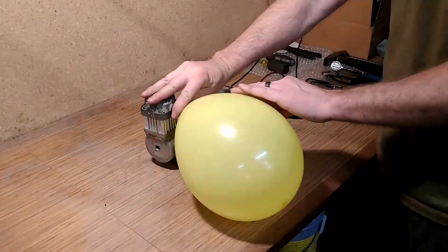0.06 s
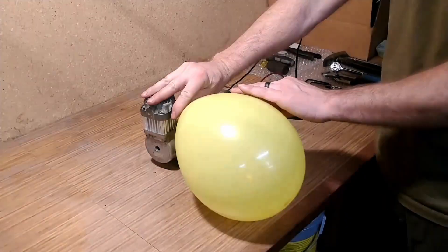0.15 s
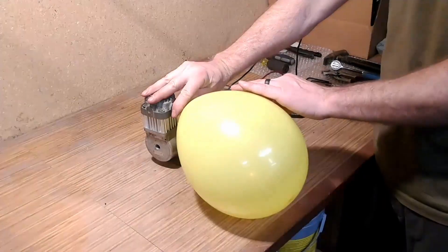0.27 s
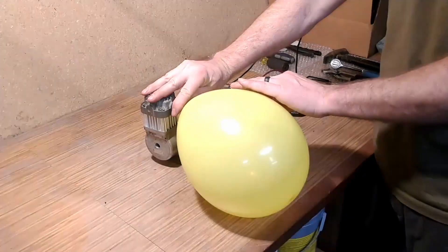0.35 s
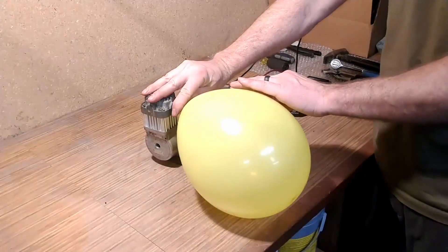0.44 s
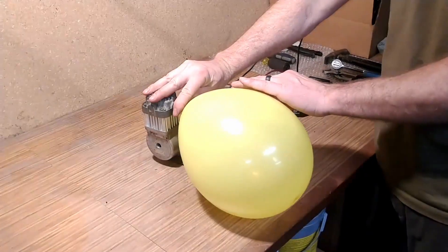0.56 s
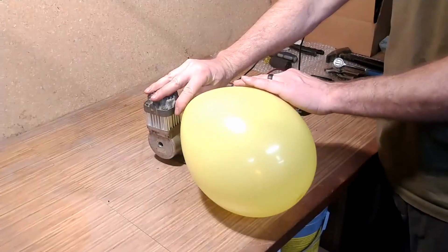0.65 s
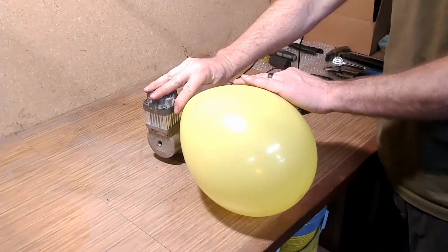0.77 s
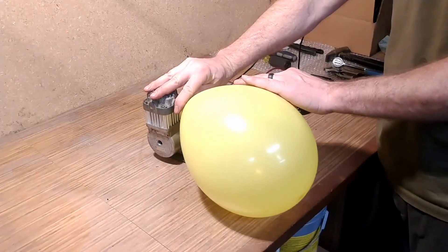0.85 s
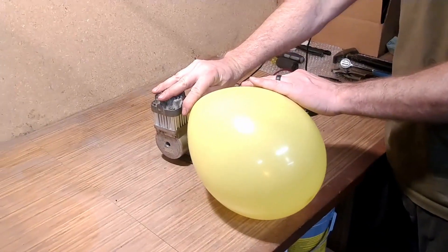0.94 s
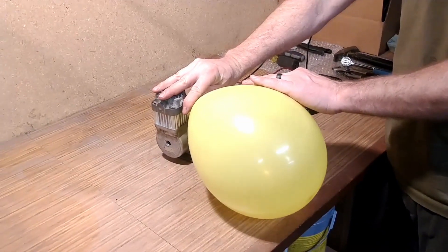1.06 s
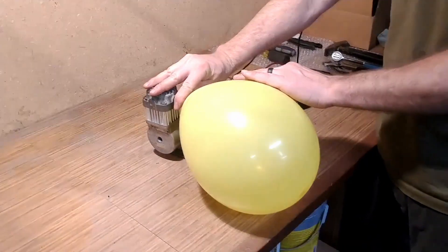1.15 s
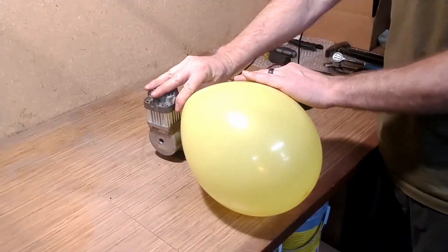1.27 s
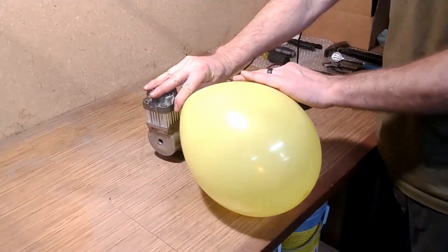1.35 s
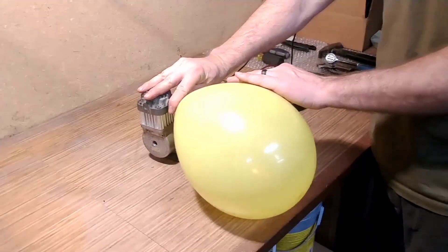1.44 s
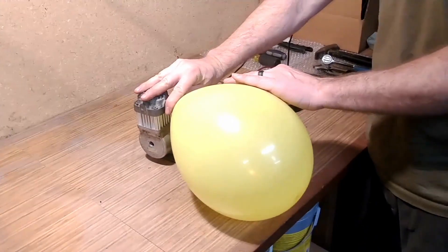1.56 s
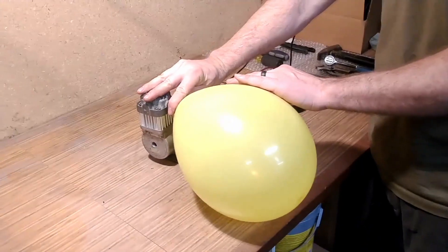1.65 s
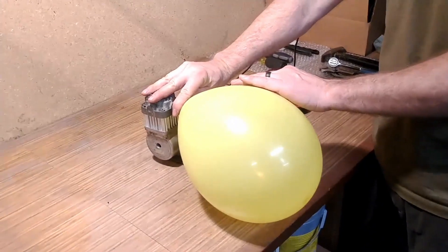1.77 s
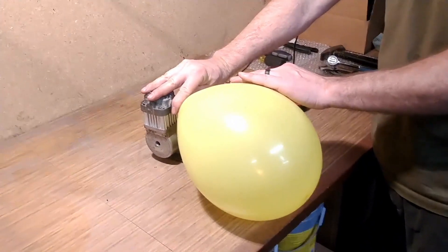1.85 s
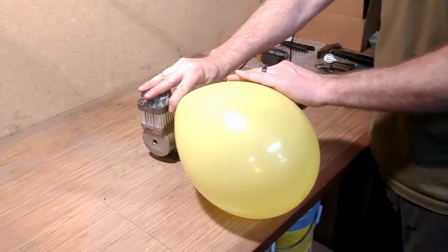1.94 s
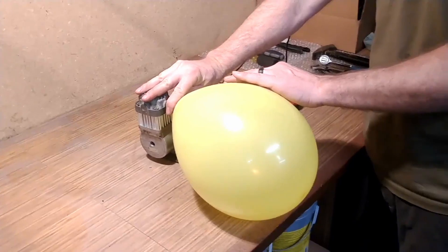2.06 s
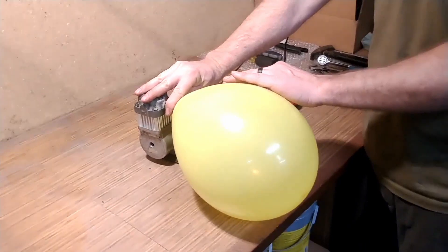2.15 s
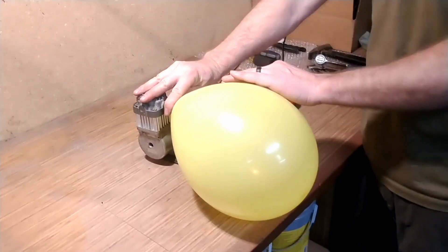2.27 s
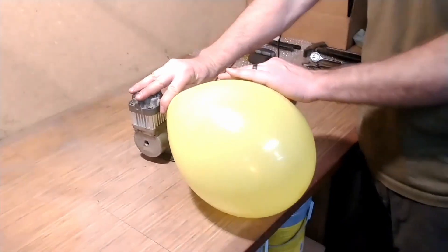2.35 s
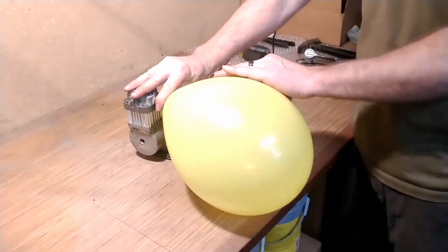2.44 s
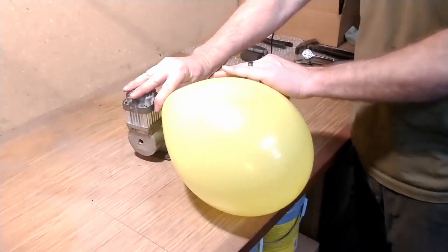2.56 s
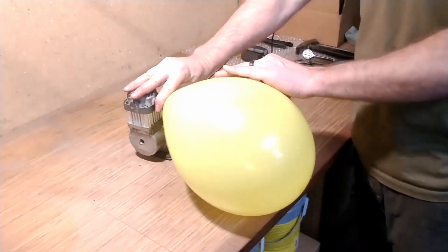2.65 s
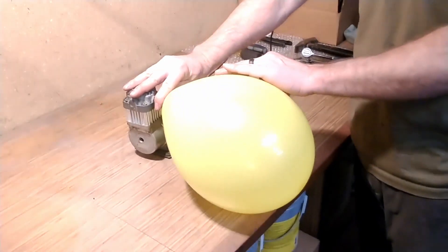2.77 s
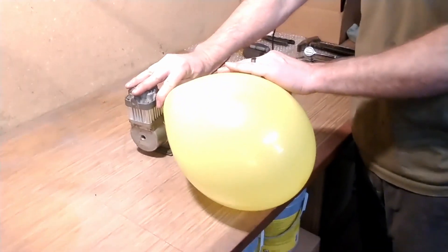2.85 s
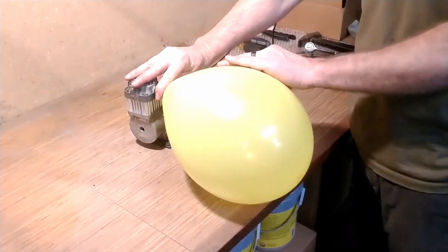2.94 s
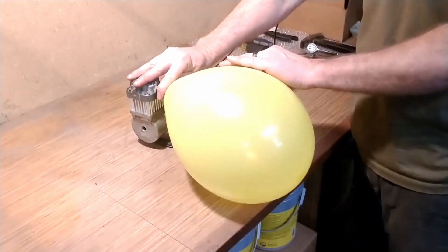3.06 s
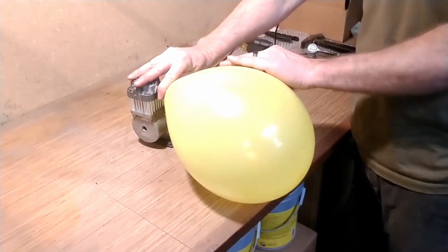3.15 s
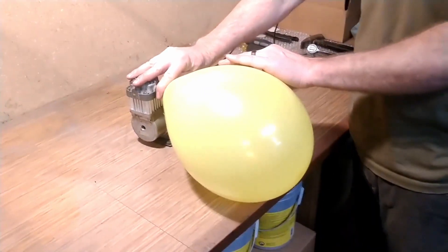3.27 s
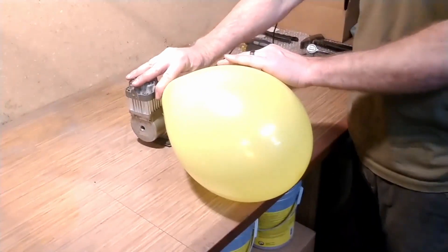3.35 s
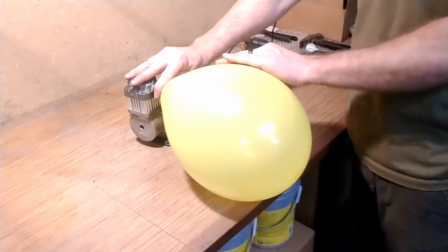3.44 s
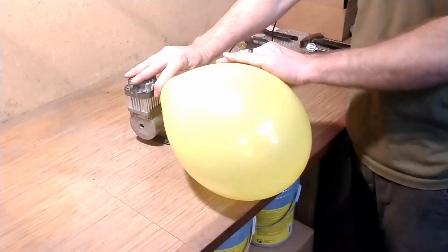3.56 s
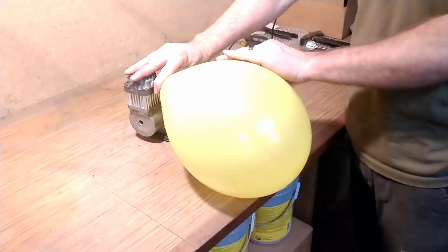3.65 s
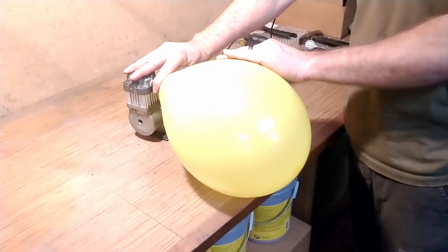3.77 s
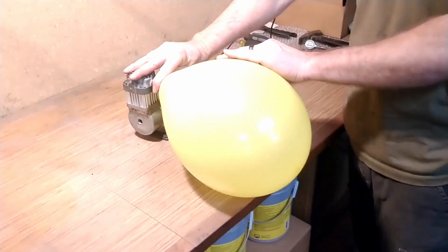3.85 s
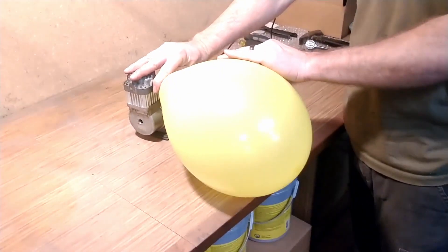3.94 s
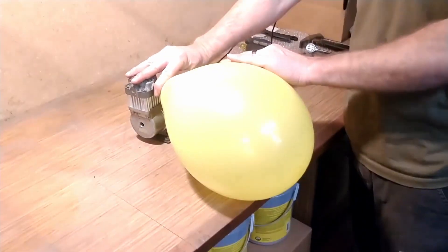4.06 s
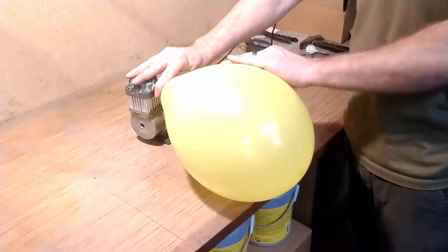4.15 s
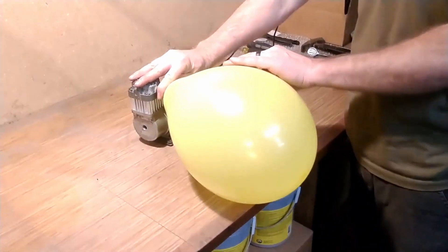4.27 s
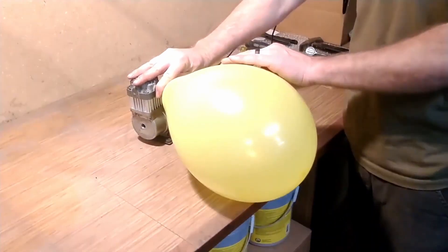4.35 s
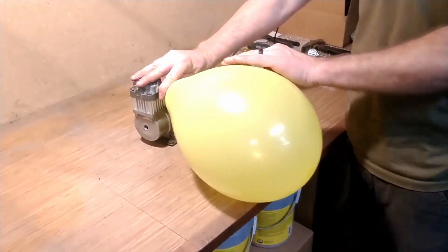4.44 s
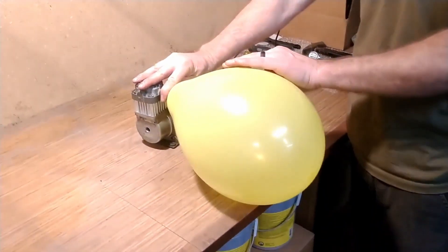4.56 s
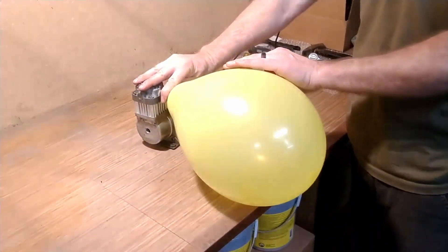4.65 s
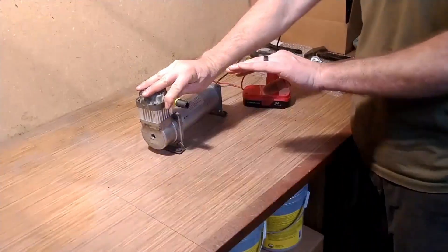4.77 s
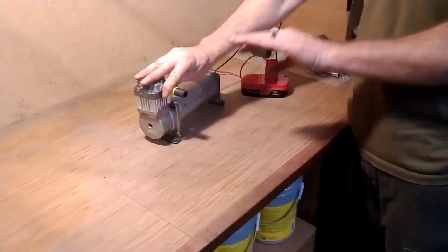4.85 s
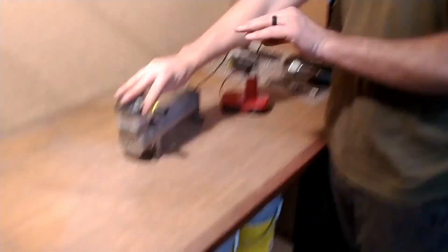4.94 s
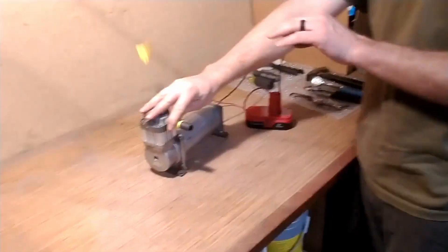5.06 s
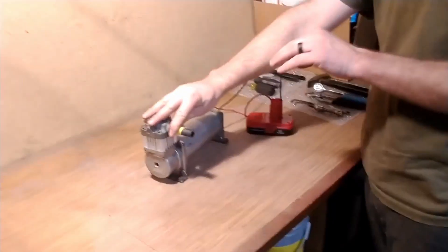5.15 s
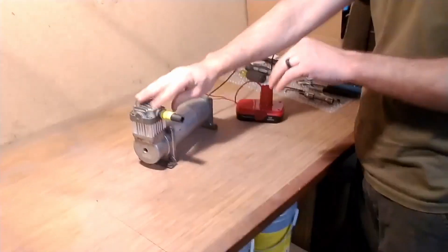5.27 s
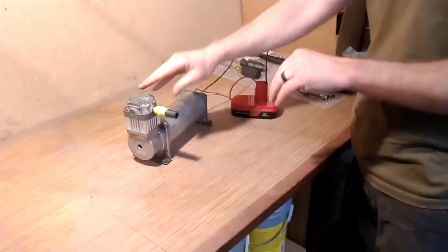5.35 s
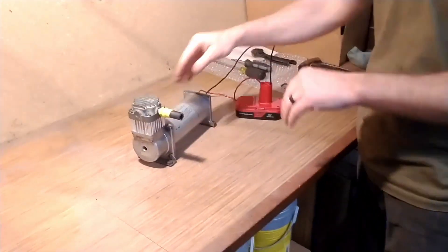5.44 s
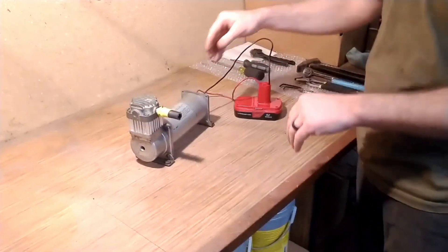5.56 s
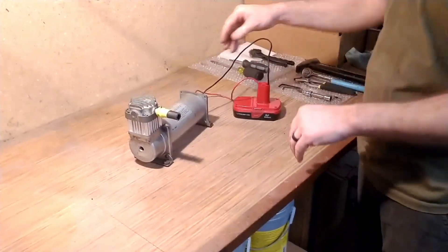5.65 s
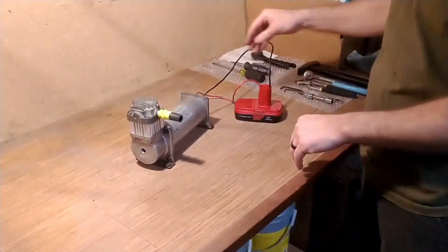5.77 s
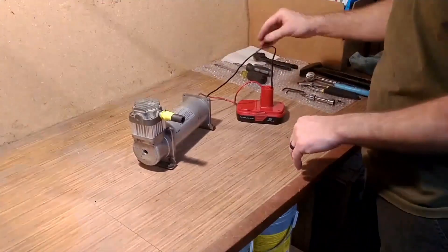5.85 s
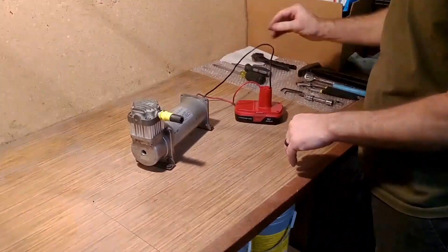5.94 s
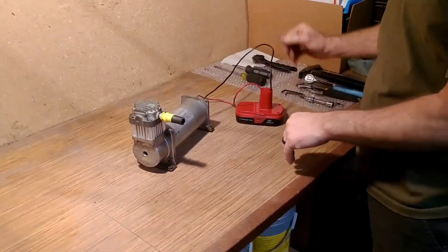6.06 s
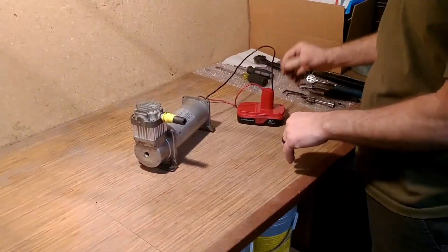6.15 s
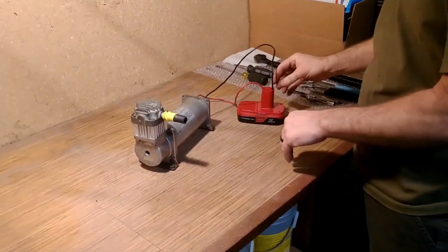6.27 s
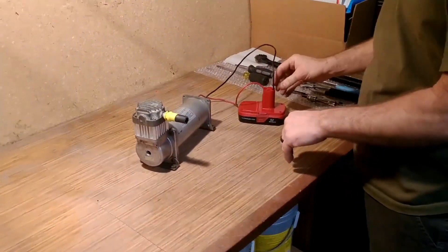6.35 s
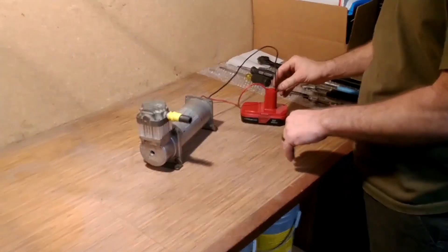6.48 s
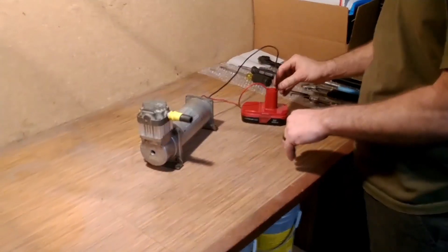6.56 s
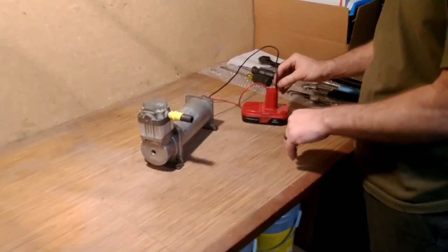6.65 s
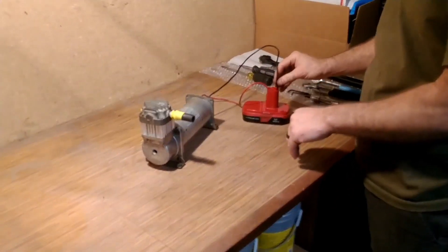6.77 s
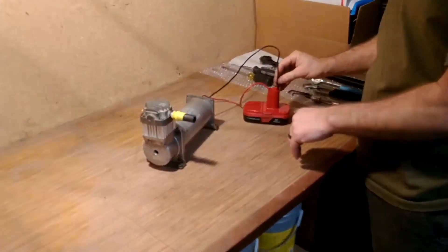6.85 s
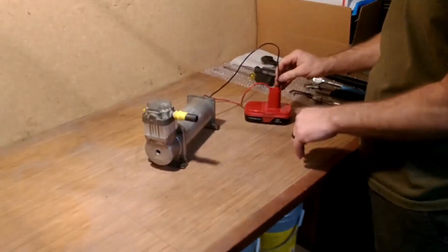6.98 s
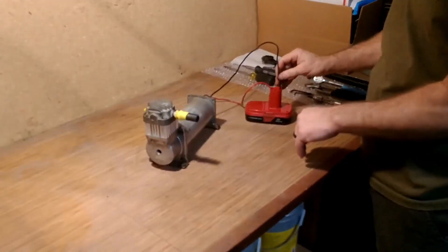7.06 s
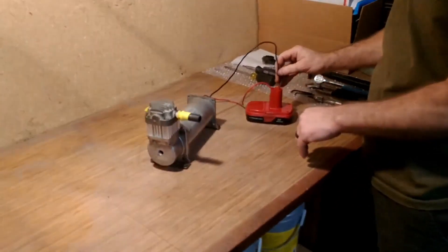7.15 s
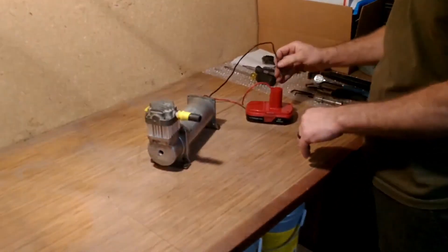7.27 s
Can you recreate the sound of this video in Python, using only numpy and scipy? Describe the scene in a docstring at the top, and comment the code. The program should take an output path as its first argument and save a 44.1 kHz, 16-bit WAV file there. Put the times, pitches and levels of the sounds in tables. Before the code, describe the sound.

Harsh motor buzz with metallic valve chatter, broken by one loud balloon pop and a brief dip, then looser rattling until power is cut.

```python
"""A buzzing, clattering compressor strains against a filling balloon, until a sharp bang echoes in a workshop.
Each crank turn gives pumping harmonics, a hiss of intake air and a valve clack that rings plate and head.
The bang is a short pressure wave with single reflections and a dense tail; gain control ducks after it.
Let go, the machine rocks on its wooden bench every third turn; at last its power is pulled and it runs down.
The machine is heard through two microphone ports, each with its own level and phase."""
import sys
import numpy as np
from scipy import signal
from scipy.fft import rfft, irfft, next_fast_len
from scipy.io import wavfile
from scipy.ndimage import uniform_filter1d, minimum_filter1d

SR = 44100
rng = np.random.default_rng(int(sys.argv[2]) if len(sys.argv) > 2 else 0)


def master(y):
    """Save y as 16-bit WAV."""
    cut = np.clip(np.atleast_2d(y).T, -1, 1)
    pcm = np.round(cut * 32767)  # scale
    wavfile.write(sys.argv[1], SR, pcm.astype(np.int16))


N = 322371
TIME = np.arange(N) / SR  # s

BURST_S = 4.8305  # the balloon bursts
POWER_OFF_S, SHUDDER_S = 7.14, 0.091  # power pulled; time for the shudder to build up
# slow swell of the machine's loudness as picked up: t/s, level/dB
LOUDNESS_SWELL = [(0, -0.5), (1.3, -1), (1.6, 0.3), (2.3, -0.7), (2.55, -1), (3.1, 0.2), (3.9, -0.8),
                  (4.12, 1), (4.7, -2.5), (5.5, .8), (6.0, -0.6), (6.52, 1.7), (6.85, -1.9), (7.1, 0.4)]


def amp(db):
    """Decibels to gain."""
    return 10 ** (np.asarray(db) / 20)


def evened(x):
    """Scales a sound so that its mid channel has rms 1."""
    mid = np.atleast_2d(x).mean(0)
    return x / np.sqrt(np.mean(mid ** 2) + 1e-20)


def read(points, hz):
    """Reads a spectrum on a log-frequency axis."""
    f, value = np.transpose(points)
    return np.interp(np.log(hz + 1), np.log(f + 1), value)


def follow(rows):
    """Turns rows (s, value, ..) into one curve per column."""
    s, *columns = np.transpose(rows)
    return [np.interp(TIME, s, c) for c in columns]


def ramp(start_s, length_s):
    """Rises from 0 to 1 over a given time."""
    return np.clip((TIME - start_s) / length_s, 0, 1)


def wander(per_s):
    """Slow random drift of rms 1: noise smoothed twice over 1/per_s seconds."""
    width = int(SR / per_s)
    smoothed = uniform_filter1d(rng.standard_normal(N), width)
    return evened(uniform_filter1d(smoothed, width))


def noise_pair(same):
    """White noise for two channels with a given likeness."""
    a, b = rng.standard_normal((2, N))
    same = np.clip(same, 0, 1)
    return np.array([a, same * a + np.sqrt(1 - same ** 2) * b])


def colour(x, points):
    """Filters a sound by a spectrum in dB."""
    size = next_fast_len(N + 4096)
    gain = amp(read(points, np.fft.rfftfreq(size, 1 / SR)))
    return irfft(rfft(x, size) * gain, size)[..., :N]


def ring(x, modes):
    """Rings decaying modes; a wider mode dies sooner, and its dB sets its share of the energy."""
    t = np.arange(SR // 4) / SR
    body = np.zeros(len(t))
    for hz, width, db in modes:
        decay = np.exp(-np.pi * width * t)
        body += amp(db) * np.sqrt(width) * decay * np.cos(2 * np.pi * hz * t)
    return signal.oaconvolve(np.atleast_2d(x), body[None], axes=1)[:, :N]


def ports(x):
    """The two microphone ports hear the machine with their own level and phase."""
    # left minus right: f/Hz, level/dB
    port_balance = [(60, 10), (125, 8), (200, 7), (314, 2.5), (400, 6), (630, 6), (850, 0), (1290, -3),
                    (1760, -3), (2400, 1.5), (2900, 2), (4400, 0), (8000, 2), (15000, -1)]
    # lead of the left port: f/Hz, phase/rad
    port_phase = [(60, 1.7), (125, 1.3), (310, 0.37), (600, 1.09), (1200, -0.4), (1700, 2), (2300, 3.5),
                  (2900, -0.1), (3400, 0), (4100, 4.5), (4850, 1.15), (6700, 1.5), (7900, 1.2), (9300, 2),
                  (10300, 1.15), (11500, 2.5), (13000, 1.34)]
    size = next_fast_len(N + 4096)
    hz = np.fft.rfftfreq(size, 1 / SR)
    half = amp(read(port_balance, hz) / 2) * np.exp(.5j * read(port_phase, hz))
    pair = np.array([half, 1 / half])
    pair /= np.sqrt(np.mean(abs(pair) ** 2, 0))  # keeps the mean power of the two
    return irfft(rfft(x, size) * pair, size)[:, :N]


def room_tail(build_s):
    """Dense reflections that hold for a moment, then die band by band."""
    # decay of the workshop: f/Hz, t60/s
    room_decay = [(150, 0.2), (1000, 0.37), (4000, 0.33), (8000, 0.28), (15000, 0.11)]
    hz, t, z = signal.stft(rng.standard_normal((2, SR // 2)), SR, nperseg=256)
    decay_db = -60 * np.maximum(t - build_s, 0) / read(room_decay, hz)[:, None]
    tail = signal.istft(z * amp(decay_db), SR, nperseg=256)[1]
    return tail / np.linalg.norm(tail[0])


def in_room(x, wet_db):
    """Adds the workshop's reverberation."""
    return x + amp(wet_db) * signal.fftconvolve(x, room_tail(build_s=0.0024), axes=1)[:, :N]


def part_level(levels_db):
    """A part's level in dB: it shifts as the balloon fills, changes at the burst and fades without power."""
    soften_s = 0.17  # fade reaches its stated run-down change after this time
    slack_db, full_db, free_db, run_down_db = levels_db
    loaded_db = slack_db + (full_db - slack_db) * ramp(0, BURST_S)
    free = ramp(BURST_S, .1)
    running_db = loaded_db * (1 - free) + free_db * free
    return running_db + run_down_db * ramp(POWER_OFF_S, soften_s) ** 2 + follow(LOUDNESS_SWELL)[0]


def crank(judder_turns):
    """The crank angle in turns: it sags slowly, then friction brakes it with judder once power is gone."""
    start_speed = 63.3  # turns/s
    sag_per_s, brake_per_s = .134, 52  # turns/s lost each second, in running and in addition without power
    speed = start_speed - sag_per_s * TIME - brake_per_s * np.maximum(TIME - POWER_OFF_S, 0)
    judder = judder_turns * ramp(POWER_OFF_S, SHUDDER_S) * wander(per_s=43)
    return np.cumsum(speed) / SR + judder


def rush(turns, hum_db, intake_turn, depth):
    """Air hisses through the intake, swelling once a turn."""
    # air rush and brush noise: f/Hz, level/dB
    rush_colour = [(25, -48), (70, -46), (150, -12), (300, 0.5), (600, 4.5), (850, 1.5), (1100, -1),
                   (1400, -10), (1850, 7), (2250, -26.5), (2800, -1.5), (4100, -9.5), (6000, -2.5),
                   (15500, -7.5)]
    gulp = 1 + depth * np.cos(2 * np.pi * (turns - intake_turn))
    hiss = colour(gulp * noise_pair(same=1.0), rush_colour)
    return amp(hum_db - 7.0) * evened(ports(hiss))


def rocking(turns, land_turn, slop_turns, chatter_db, count=3):
    """Feet strike the bench every third turn, unevenly after release; in run-down they stumble and chatter."""
    # modes of the bench top: f/Hz, width/Hz, share/dB
    bench_modes = [(85, 7.3, -3.5), (103.3, 9, 8.5), (168.2, 3.1, 5.5), (189.7, 14, 12), (216, 28, -13),
                   (235, 44, -42)]
    # colour of the chattering feet: f/Hz, level/dB
    chatter_colour = [(50, -31), (110, -18), (190, -22), (400, -2), (800, -11), (2000, -13), (6000, -23)]
    ease_s, let_go_s, hand_move_s = 5.06, 5.35, .04  # grip eases, hand lets go, time each move takes
    gripped_db, rock_db = -31, -25.5  # under the loose grip, and free
    settle_s, settled_uneven = 0.374, 0.035  # time to find a rhythm; unevenness left, 0-1

    coasting, released = ramp(POWER_OFF_S, SHUDDER_S), ramp(let_go_s, hand_move_s)
    unsettled = np.exp(-(np.maximum(TIME - let_go_s, 0) / settle_s) ** 2)
    uneven = np.maximum(settled_uneven, np.maximum(unsettled, coasting)) * released
    gripped = ramp(ease_s, hand_move_s) * (1 - released)
    level = amp(gripped_db) * gripped + amp(rock_db) * released

    # each completed group of turns is one landing; the slop shifts it in time
    cycle = np.floor((turns - land_turn + slop_turns * uneven * wander(per_s=33.3)) / count)
    landings = np.diff(np.maximum.accumulate(cycle), prepend=cycle[0])
    weight = amp(1.3 * uneven * wander(per_s=12))
    # band of the thumps: low bass cut as by the microphone, little above 400 Hz
    thump_band = [(40, -32), (80, 4), (240, 2.0), (400, -30)]
    thumps = evened(ports(colour(ring(landings * weight, bench_modes), thump_band)))

    # every landing sets off a dying burst of noise
    scuff = signal.lfilter([1], [1, -np.exp(-1 / (0.081 * SR))], landings)
    chatter = evened(ports(colour(scuff * noise_pair(same=0.98), chatter_colour)))
    return level * amp(follow(LOUDNESS_SWELL)[0]) * (thumps + amp(chatter_db) * coasting * chatter)


def strokes(turns, at_turn, rise_turn, fall_turn, spread_db, slam_share):
    """One quickly dying blow per crank turn, each of its own strength."""
    # harder slams, scaled by slam_share: t/s, extra level/dB
    slams = [(2.031, 2), (2.236, 2.5), (2.285, 4), (2.3, 2.5), (2.427, 2), (3.222, 3.5), (3.429, 3.5),
             (5.246, 3), (5.326, 2.5), (5.486, 3), (6.109, 1), (6.173, 1.5), (6.382, 3)]
    stroke, age = np.divmod(turns - at_turn + 1, 1)
    stroke = np.maximum(stroke.astype(int), 0)
    size_db = spread_db * rng.standard_normal(N // 256)
    for s, extra_db in slams:
        size_db[stroke[int((s + .008) * SR)]] = slam_share * extra_db  # replaces the random strength
    return amp(size_db[stroke]) * (1 - np.exp(-age / rise_turn)) * np.exp(-age / fall_turn)


def valve(turns, clack_db, plate_db, head_db):
    """The valve slaps shut once a turn: a bright crack, a ringing plate, then the ringing head."""
    # colour of the clack: f/Hz, level/dB
    clack_colour = [(3900, -66), (5200, 2), (5700, -5), (6700, 3), (7300, -2.5), (7900, 5.5), (9100, -8.5),
                    (10200, 2.5), (11400, -6.5), (12300, 4.5), (13200, 4), (14200, -4.5), (15100, 5),
                    (16000, -10.5)]
    # ringing of the valve plate: f/Hz, width/Hz, share/dB
    plate_modes = [(4729, 153, 7), (4875, 89, 3)]
    # ringing of the cylinder head: f/Hz, width/Hz, share/dB
    head_modes = [(1860, 300, -11.5), (2904, 60, -2), (2790, 600, -4), (3573, 50, -7)]

    slap = strokes(turns, at_turn=0.16, rise_turn=0.13, fall_turn=0.12, spread_db=1.8, slam_share=0.81)
    crack = colour(slap * noise_pair(same=0.99), clack_colour)
    clack = evened(in_room(ports(crack), wet_db=-4.5))

    flick = strokes(turns, at_turn=0.18, rise_turn=0.058, fall_turn=0.19, spread_db=1.67, slam_share=2.9)
    plate_ring = ring(flick * noise_pair(same=0.89), plate_modes)
    plate = evened(in_room(ports(plate_ring), wet_db=-7.0))

    exhaust = strokes(turns, at_turn=0.307, rise_turn=0.14, fall_turn=0.16, spread_db=2.34, slam_share=0.35)
    head_ring = ring(exhaust * noise_pair(same=0.96), head_modes)
    head = evened(in_room(ports(head_ring), wet_db=-1))

    parts = amp(clack_db) * clack + amp(plate_db) * plate + amp(head_db) * head
    # colouring of the recorder: dips near 2.2 and 4.1 kHz
    recorder_colour = [(1900, 0.5), (2250, -23), (2700, 2.5), (3700, 0.0), (4100, -8.0), (4500, -1)]
    return colour(parts, recorder_colour)


def balloon_boost(hz, pitch):
    """The dB by which the air in the balloon lifts a harmonic that lies near one of its modes."""
    # modes of the balloon's air: factor on its pitch, width/Hz, boost/dB
    balloon_modes = [(.47, 70, 2.5), (1, 139, 4.5)]
    return sum(db * np.exp(-((hz - factor * pitch) / width) ** 2) for factor, width, db in balloon_modes)


def pumping(turns, hum_db, knock_db, waver_db, last_thump=4, last_intake=14):
    """Crank harmonics: piston thump lowest, then the intake pulse, then the knock of rod and bearing."""
    # pumping tone: multiple of crank speed, level feeding the balloon/dB, level running free/dB
    pump_orders = [(1, -17.5, -22), (2, -4.5, -6), (3, -5, -7.5), (4, -8.5, -10), (5, 1.5, -2.5),
                   (6, -7.5, -11.5), (7, -8.5, -11), (8, -8.5, -8), (9, -9.5, -10.5), (10, -4.5, -7.5),
                   (11, -7.5, -15), (12, -44, -27), (13, -13, -19.5), (14, -14, -18.5), (15, -13, -10.5),
                   (16, -17, -10), (17, -29, -21), (18, -26, -30), (19, -14, -12), (20, -36, -28),
                   (21, -20, -31), (22, -12.5, -15.5), (23, -40, -21), (24, -35, -23), (25, -27, -20),
                   (26, -16.5, -12), (27, -10, -12.5), (28, -3, -4.5), (29, -33, -16), (30, -5, -22)]
    # air resonance, falling as the balloon swells: t/s, f/Hz
    balloon_pitch = [(0, 1802), (2, 1730), (3.2, 1230), (4.1, 1130), (4.8, 1110)]
    # place in the turn 0-1, random phase spread of the harmonics in radians
    thump, intake, knock = (0.26, 0.078), (.96, 0.94), (.47, 1.16)

    free = ramp(BURST_S, .1)
    pitch, mean_speed = follow(balloon_pitch)[0], turns[-1] / TIME[-1]
    wavers = [amp(waver_db * wander(per_s=12.0)) for _ in range(5)]
    lines = []
    for k, (_, held_db, free_db) in enumerate(pump_orders, 1):
        at_turn, spread = thump if k <= last_thump else intake if k <= last_intake else knock
        held = amp(held_db + balloon_boost(k * mean_speed, pitch))
        size = held * (1 - free) + amp(free_db) * free
        phase = 2 * np.pi * k * (turns - at_turn) + spread * rng.standard_normal()
        lines.append(size * wavers[k % len(wavers)] * np.cos(phase))
    hum = evened(ports(sum(lines[:last_intake])))
    knocking = evened(ports(sum(lines[last_intake:])))
    return amp(hum_db) * hum + amp(knock_db) * knocking


def pressure_wave(s, length_s):
    """A sudden push followed by a weaker pull."""
    u = np.maximum(TIME - s, 0) / length_s
    return (TIME >= s) * (1 - u) * np.exp(-u)


def burst(blast_db, blast_s, echo_db, slap_s):
    """The balloon tears: one short pressure wave, a few single reflections, then the workshop's dense echo."""
    # colour of the echo: f/Hz, level/dB
    echo_colour = [(30, -25), (150, 0), (450, 6.5), (900, 4.5), (1600, 3), (2100, -1.5), (3000, 4),
                   (4100, -7), (5000, -0.5), (9000, -5.5), (15500, -9.5)]
    # reflections from bench, walls and ceiling: delay/s, level against the echo/dB
    reflections = [(.0026, -11), (.0085, -11), (0.0212, 19), (0.0389, 9), (.0455, -9)]
    start = int(BURST_S * SR)
    tail = room_tail(build_s=0.047)
    echo = np.zeros((2, N))
    echo[:, start:start + tail.shape[1]] = tail
    echo = colour(echo, echo_colour) * (TIME >= BURST_S)
    echo = echo / echo[:, start:start + SR // 40].std()  # its first 25 ms set the level
    slaps = sum(amp(db) * pressure_wave(BURST_S + delay, slap_s) for delay, db in reflections)
    return amp(blast_db) * pressure_wave(BURST_S, blast_s) + amp(echo_db) * (echo + slaps)


def scene():
    """The running compressor and the bursting balloon."""
    # part levels, each: balloon slack/dB, balloon full/dB, running free/dB, change while running down/dB
    hum_levels = (-23, -22, -20.5, -5.5)
    knock_levels = (-36.5, -29, -30, -17)
    clack_levels = (-21.5, -20, -22, -11.5)
    plate_levels = (-24, -21, -22.5, -17)
    head_levels = (-24.5, -24, -27, -3.5)
    # the head's ringing comes and goes: t/s, level/dB
    head_swell = [(0, 0), (1.3, -.8), (1.8, -0.5), (2.2, -3.5), (2.6, -3.5), (2.9, 0), (3.4, 0), (3.7, 0.5),
                  (4.25, -4), (4.55, 0.5), (5.8, -0.5)]

    turns = crank(judder_turns=.05)
    hum_db, knock_db = part_level(hum_levels), part_level(knock_levels)
    clack_db, plate_db = part_level(clack_levels), part_level(plate_levels)
    head_db = part_level(head_levels) + follow(head_swell)[0]

    pump = pumping(turns, hum_db, knock_db, waver_db=.5)
    air = rush(turns, hum_db, intake_turn=0.83, depth=0.13)
    clatter = valve(turns, clack_db, plate_db, head_db)
    feet = rocking(turns, land_turn=1.834, slop_turns=0.676, chatter_db=-4.5)
    bang = burst(blast_db=21.5, blast_s=0.00028, echo_db=5.5, slap_s=0.00011)
    return pump + air + clatter + feet + bang


def gain_control(x, threshold_db, hold_s, recover_db_per_s, attack_s):
    """Turns down fast on a loud sound, waits, and creeps back up."""
    lag = np.exp(-1 / (0.0063 * SR))  # level detector, 6.3 ms
    power = signal.lfilter([1 - lag], [1, -lag], (x ** 2).mean(0))
    power_db = 10 * np.log10(power + 1e-12)
    width = int(hold_s * SR) | 1
    # the highest recent excess is held, then let down at a steady rate
    over_db = -minimum_filter1d(-np.maximum(power_db - threshold_db, 0), width, origin=width // 2)
    fall = TIME * recover_db_per_s
    over_db = np.maximum.accumulate(over_db + fall) - fall
    lag = np.exp(-1 / (attack_s * SR))
    return x / amp(signal.lfilter([1 - lag], [1, -lag], over_db))


def record(dry):
    """Gain control, overload clipping at full scale, and the band limit."""
    ducked = gain_control(dry, threshold_db=-9.0, hold_s=0.073, recover_db_per_s=16, attack_s=0.00093)
    clipped = np.clip(ducked, -1, 1)
    band_limit = signal.firwin(511, 15720, window=("kaiser", 9), fs=SR)  # low-pass edge in Hz
    return signal.oaconvolve(clipped, band_limit[None], "same")


dry = scene()
out = record(dry)
master(out)
```